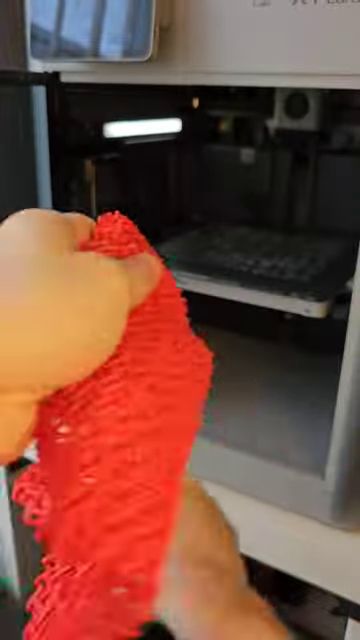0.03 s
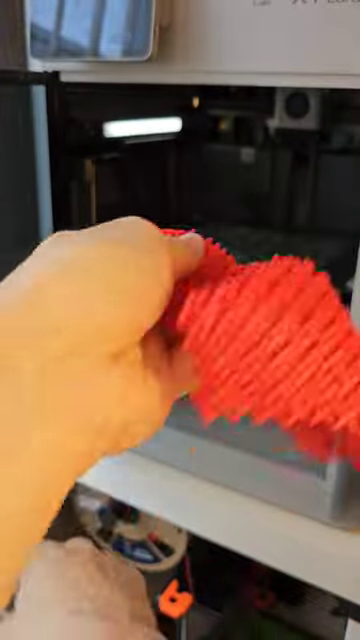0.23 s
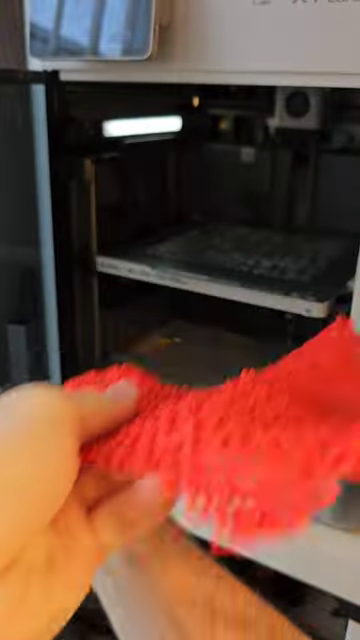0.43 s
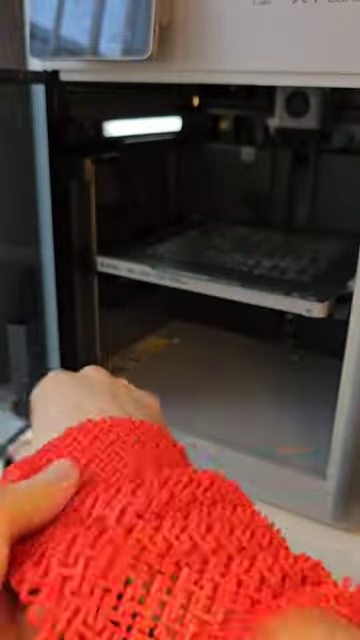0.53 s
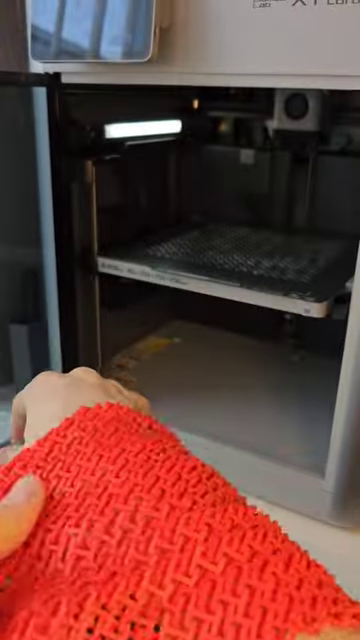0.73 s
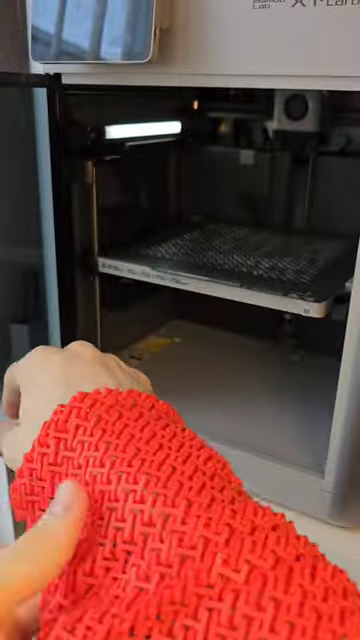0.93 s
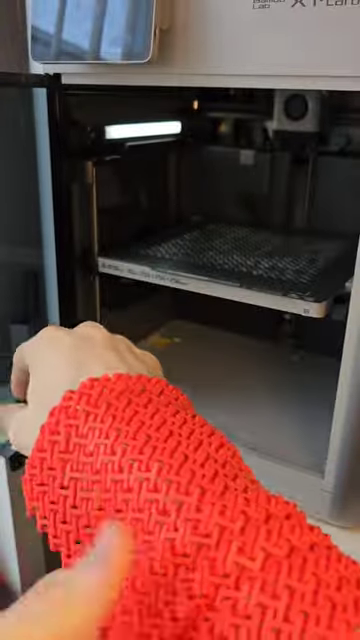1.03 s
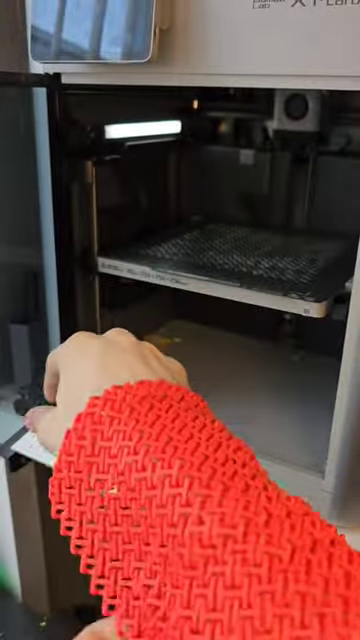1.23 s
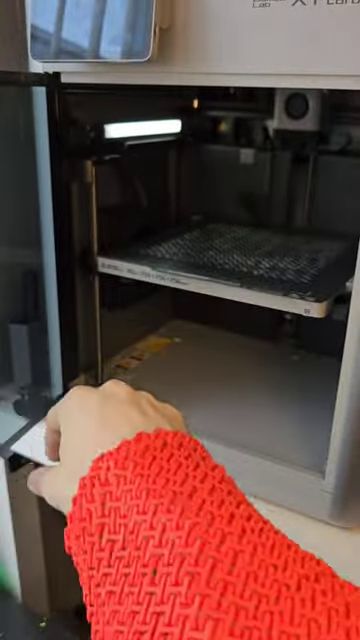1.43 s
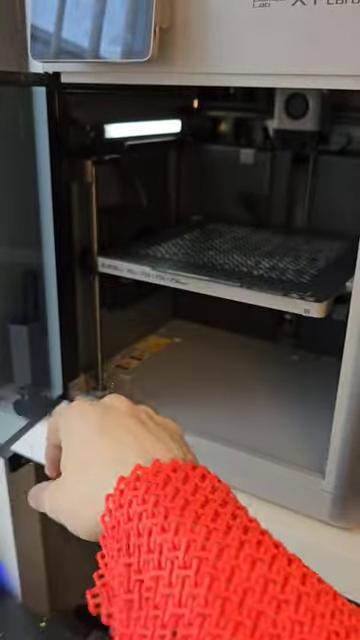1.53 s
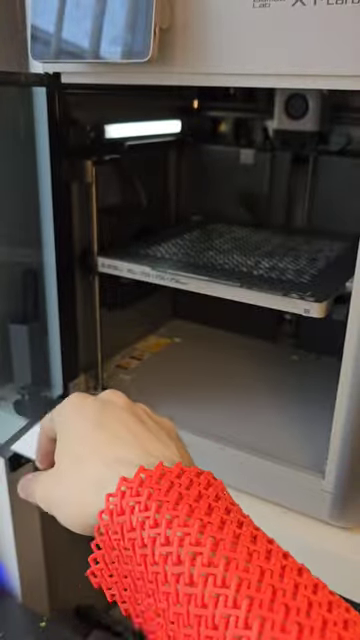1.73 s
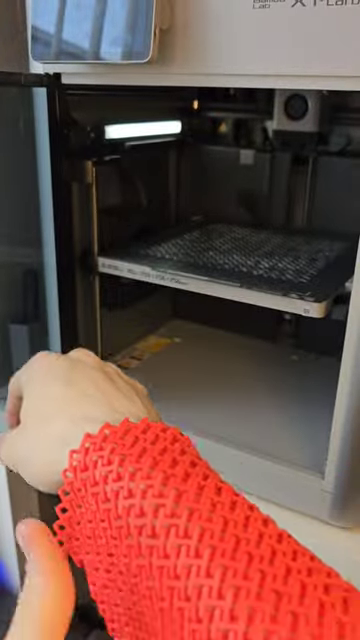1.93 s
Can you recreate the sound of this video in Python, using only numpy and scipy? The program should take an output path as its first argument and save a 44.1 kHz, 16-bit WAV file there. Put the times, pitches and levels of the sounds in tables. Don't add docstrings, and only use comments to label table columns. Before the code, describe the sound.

Crisp plastic chain fabric clatters, knocks and swishes in quick bursts near a softly humming machine

```python
import sys
import numpy as np
from scipy import signal
from scipy.io import wavfile
from scipy.ndimage import uniform_filter1d

SR = 44100
rng = np.random.default_rng(int(sys.argv[2]) if len(sys.argv) > 2 else 0)


def magnitude_from_level(level_db):
    exponent = np.asarray(level_db, float) / 20
    return 10 ** exponent


def master_out(mix):
    frames = np.transpose(np.atleast_2d(mix))
    ceiling = np.clip(frames, -1, 1)
    pcm = np.round(ceiling * 32767).astype(np.int16)
    wavfile.write(sys.argv[1], SR, pcm)


N = 88200

# f/Hz, level/dB
FAN_SPECTRUM = [(15, 4.5), (30, 4), (59, -7.5), (156, -1), (362, -5), (615, -8), (694, -7.5), (796, -16.5),
                (1500, -17.5), (1950, -25.5), (3300, -120)]
# f/Hz, level/dB
HISS_SPECTRUM = [(700, 8), (1500, 1), (3000, 2), (6000, -20), (10000, -12), (16000, -38)]
# f/Hz, likeness/1
PORT_LIKENESS = [(25, 1), (50, 0.84), (100, 0.95), (180, 0.89), (300, 0.88), (500, 0.52), (1500, 0.026)]
# f/Hz, left-right/dB
PORT_LEAN = [(60, 6), (150, 9.5), (300, 3), (600, 1), (1500, 5.5)]
# t/s, level/dB
HUM_SWELL = [(0.0, -90), (0.06, -77), (0.15, -74), (0.38, -58.5), (0.63, -60), (0.75, -71.5), (0.95, -60),
             (1.15, -66.5), (1.39, -57.5), (1.5, -67.5), (1.78, -59), (2.0, -59)]
# f/Hz, width/Hz, level/dB
FAN_TONES = [
    (79, 11, -69.5),
    (222.1, 41, -68),
    (498, 1.9, -78.5),
    (698, 10.7, -75),
]
# t/s at the peak, level/dB, rise/(dB/s), fall/(dB/s), clatter weight/dB
SWISHES = [(0.11, -39, 15, 73, -1.5), (0.145, -35, 5000, 354, -2.5), (0.233, -40, 2500, 79, 1),
           (0.195, -59, 78, 126, 13), (0.299, -32.5, 265, 210, -5), (0.372, -36, 900, 234, -3),
           (0.483, -39, 226, 211, -0.5), (0.552, -27.5, 2237, 246, -5), (0.579, -29, 388, 168, 4),
           (0.632, -27.5, 300, 392, -10.5), (0.71, -52.5, 150, 105.5, 1.5), (0.877, -52, 68, 84, 3),
           (1.064, -39.5, 166, 96, 1.5), (1.168, -42, 403, 500, -0.5), (1.209, -39.5, 502, 238, 0),
           (1.272, -42, 498, 210, -9), (1.308, -38, 195, 263, 0.5), (1.396, -38.5, 1203, 2505, -2.5),
           (1.402, -31.5, 3000, 2002, -6.5), (1.45, -59.5, 59, 36, 4), (1.536, -44.5, 308, 191, 3.5),
           (1.696, -42, 206, 301, 3.5), (1.722, -26.5, 798, 381, -10.5), (1.789, -44.5, 188, 146, -1.5),
           (1.837, -40.5, 5000, 504, -6)]
# t/s, level/dB
FOLD_KNOCKS = [(0.148, -32.5), (0.232, -46), (0.299, -45), (0.354, -35), (0.373, -37), (0.557, -23),
               (0.569, -23.5), (0.574, -23), (0.5806, -36), (0.584, -37), (0.598, -21), (0.611, -35),
               (0.627, -44.5), (0.632, -43), (1.023, -38), (1.044, -45), (1.067, -36), (1.154, -34.5),
               (1.171, -35), (1.209, -37), (1.23, -38), (1.276, -46), (1.309, -38), (1.411, -58),
               (1.521, -50), (1.698, -39), (1.709, -40), (1.72, -37), (1.729, -37), (1.741, -33.5),
               (1.759, -33), (1.84, -50), (1.858, -42)]
# t/s, left-right/dB
SHEET_PLACE = [
    (0, 3.5),
    (.3, 10),
    (.56, 12.5),
    (.9, 8),
    (1.1, 7.5),
    (1.4, 5),
    (1.54, 10.5),
    (1.72, 2),
    (2, 18),
]
# f/Hz, level/dB
TICK_TONE = [(1500, -58), (4000, -26.5), (6000, -19), (8000, -18.5), (10000, -15), (13000, -15),
             (16500, -21)]
# f/Hz, level/dB
CLATTER_TONE = [(500, -35), (900, -26), (1800, -25), (3000, -13.5), (4500, -14.5), (7000, -15),
                (9500, -14.5), (13000, -27.5)]
# f/Hz, depth/dB
SHADING_DEPTH = [(1000, 0), (2000, 3.5), (6500, 3.5), (10000, 1.5), (12000, 0)]
# f/Hz, width/Hz, lift/dB
PORT_RINGS = [
    [(11507, 480, 15), (2700, 540, -7), (3970, 3300, -2.5)],
    [(11428, 317, 25), (2260, 1540, 1.5), (4750, 1300, 1)],
]


def evened(x):
    return x / np.sqrt(np.mean(x ** 2) + 1e-20)


def read(points, hz):
    f, value = np.transpose(points)
    return np.interp(np.log(hz + 1), np.log(f + 1), value)


def colour(x, gain_db):
    log_gain = np.log(magnitude_from_level(np.r_[gain_db, gain_db[-2:0:-1]]))
    taps = np.fft.ifft(np.exp(np.conj(signal.hilbert(log_gain)))).real
    return signal.oaconvolve(x, taps[:1024])[:N]


def wash(spectrum, patch_db):
    frames, hz = N // 256 + 5, np.fft.rfftfreq(1024, 1 / SR)
    a, b, c, d, patches = rng.standard_normal((frames, 513, 5)).T
    patches = uniform_filter1d(patches, size=8, axis=0)
    patches = evened(uniform_filter1d(patches, size=14, axis=1))
    same = np.clip(read(PORT_LIKENESS, hz), -1, 1)[:, None]
    lean = magnitude_from_level(read(PORT_LEAN, hz) / 2)[:, None]
    left = a + 1j * b
    right = same * left + np.sqrt(1 - same ** 2) * (c + 1j * d)
    gain = magnitude_from_level(read(spectrum, hz)[:, None] + patch_db * patches)
    z = np.array([left * lean, right / lean]) * gain
    return evened(signal.istft(z, nperseg=1024, noverlap=768)[1][:, :N])


def fan_tone(hz, width_hz, level_db):
    t = np.arange(N) / SR
    pole = np.exp(-np.pi * width_hz / SR)
    a, b = rng.standard_normal((N, 2, 2)).T
    drift = signal.lfilter([1], [1, -pole], a + 1j * b)
    drift = signal.lfilter([1], [1, -pole], drift)
    mix = drift + min(300 / hz, 1) * drift[::-1]
    return magnitude_from_level(level_db) * evened((mix * np.exp(2j * np.pi * hz * t)).real)


def machine():
    t = np.arange(N) / SR
    swell = magnitude_from_level(np.interp(t, *np.transpose(HUM_SWELL)) + 2)
    out = swell * np.sin(2 * np.pi * 149.7 * t) * magnitude_from_level([[1.2], [-1.2]])
    for hz, width_hz, level_db in FAN_TONES:
        out = out + fan_tone(hz, width_hz, level_db)
    return out + magnitude_from_level(-60) * wash(FAN_SPECTRUM, patch_db=0.97) + magnitude_from_level(-66) * wash(HISS_SPECTRUM, patch_db=3.8)


def room(x, t60_s=0.06):
    t = np.arange(SR // 2) / SR
    onset = np.minimum(t / 0.0039, 1)
    tail = rng.standard_normal((len(t), 2)).T * magnitude_from_level(-60 * t / t60_s) * onset
    return signal.fftconvolve(x[::-1], tail / np.linalg.norm(tail[0]), axes=1)[:, :N]


def link_ticks(count=14, low_hz=1120, top_hz=16300, q=3.6):
    ticks_per_s, spread_db, clump_db, clump_s = 9000, 3.5, 1, 0.002
    shared = 0.09
    width = round(clump_s * SR)
    crowd = uniform_filter1d(rng.standard_normal(N), size=width)
    crowd = uniform_filter1d(crowd, size=width)
    clump = magnitude_from_level(clump_db * evened(crowd))
    t, out = np.arange(256) / SR, 0
    for hz in np.geomspace(low_hz, top_hz, count):
        chance, size = rng.random((2, 3, N))
        force = magnitude_from_level(-spread_db * np.log(size + 0.03))
        sign = np.sign(chance * SR % 2 - 1)
        hits = force * sign * (chance < ticks_per_s / SR)
        pair = np.sqrt(1 - shared) * hits[:2] + np.sqrt(shared) * hits[2]
        ring = np.exp(-np.pi * hz / q * t) * np.cos(2 * np.pi * hz * t)
        ring = ring / np.linalg.norm(ring)
        out = out + np.sqrt(hz) * signal.oaconvolve(pair, ring[None], axes=1)[:, :N]
    return evened(out * clump)


def sheet_motion():
    t = np.arange(N) / SR
    bright = heavy = magnitude_from_level(-68.5) ** 2
    for s, level_db, rise, fall, weight_db in SWISHES:
        power = magnitude_from_level(level_db - np.where(t < s, rise * (s - t), fall * (t - s))) ** 2
        bright, heavy = bright + power, heavy + power * magnitude_from_level(weight_db) ** 2
    rise_s, fall_s, weight_db = 0.0004, 0.0018, -9
    for s, level_db in FOLD_KNOCKS:
        power = magnitude_from_level(level_db) ** 2 * np.exp(-np.where(t < s, (s - t) / rise_s, (t - s) / fall_s))
        bright, heavy = bright + power, heavy + power * magnitude_from_level(weight_db) ** 2
    return bright, heavy


def link_sheet():
    t, hz = np.arange(N) / SR, np.fft.rfftfreq(2048, 1 / SR)
    bright, heavy = sheet_motion()
    pan = magnitude_from_level(np.interp(t, *np.transpose(SHEET_PLACE)) * np.array([[0.5], [-0.5]]))
    near = []
    for swarm in link_ticks() * pan:
        ticks = colour(swarm * np.sqrt(bright), read(TICK_TONE, hz) + 5)
        clatter = colour(swarm * np.sqrt(heavy), read(CLATTER_TONE, hz) + 5)
        near.append(ticks + clatter)
    near = np.array(near)
    return near + magnitude_from_level(-9) * room(near)


def shade(x):
    hz, t, z = signal.stft(x, SR, nperseg=1024, noverlap=768)
    patches = rng.standard_normal((len(t), len(hz))).T
    for _ in range(2):
        patches = uniform_filter1d(patches, size=4, axis=0)
        patches = uniform_filter1d(patches, size=7, axis=1)
    gain = magnitude_from_level(read(SHADING_DEPTH, hz)[:, None] * evened(patches))
    return signal.istft(z * gain, SR, nperseg=1024, noverlap=768)[1][:, :N]


def scene():
    return shade(machine() + link_sheet())


def top_cut(x):
    return signal.sosfilt(signal.butter(12, 15835, fs=SR, output="sos"), x)


def record(dry):
    hz = np.fft.rfftfreq(2048, 1 / SR)
    lifted = []
    for x, port, top_db in zip(dry, PORT_RINGS, [19.5, 19]):
        rings = list(port) + [(15450, 1240, top_db)]
        lift_db = sum(db / (1 + ((hz - f) / width) ** 2) for f, width, db in rings)
        lifted.append(colour(x, lift_db))
    lifted = np.array(lifted)
    edge = signal.firwin(1501, 15510, window=("kaiser", 5), fs=SR)
    mix = signal.oaconvolve(lifted, edge[None], "same", axes=1) + magnitude_from_level(-43) * lifted
    mix = signal.lfilter(*signal.butter(2, 33, "high", fs=SR), mix)
    return top_cut(mix)


dry = scene()
out = record(dry)
master_out(out)
```